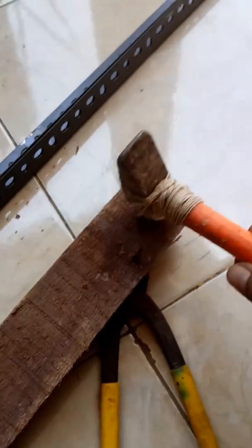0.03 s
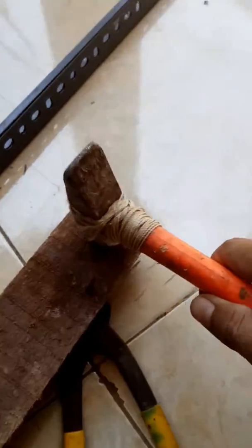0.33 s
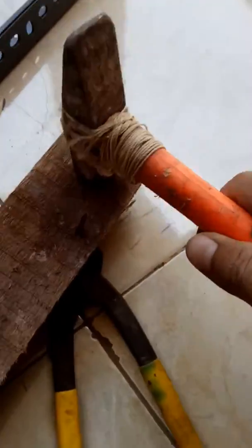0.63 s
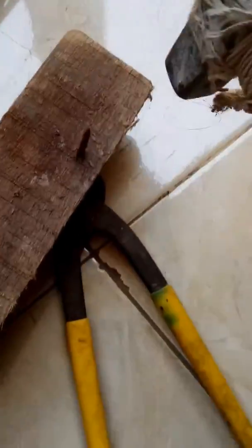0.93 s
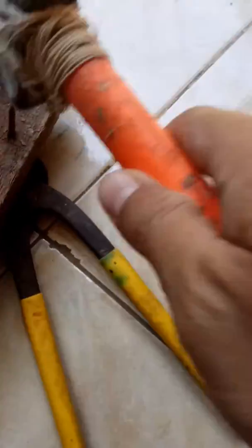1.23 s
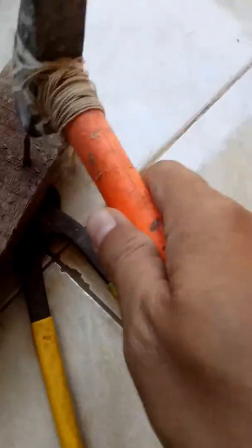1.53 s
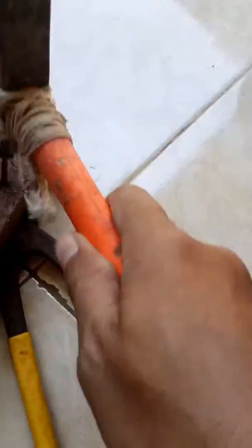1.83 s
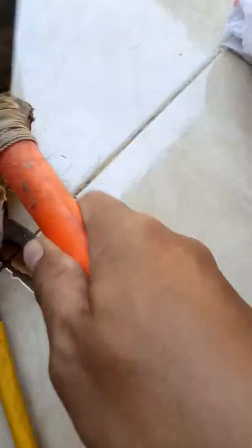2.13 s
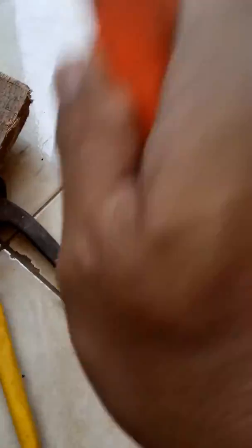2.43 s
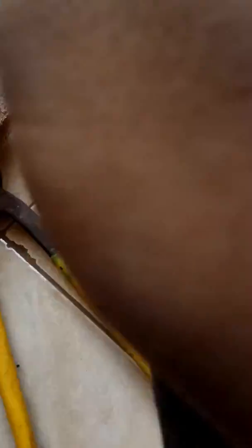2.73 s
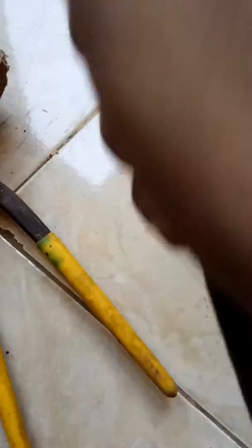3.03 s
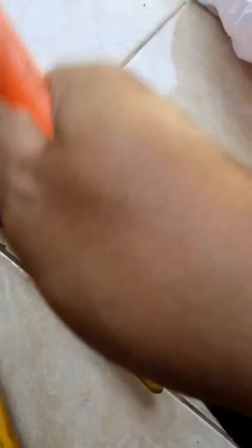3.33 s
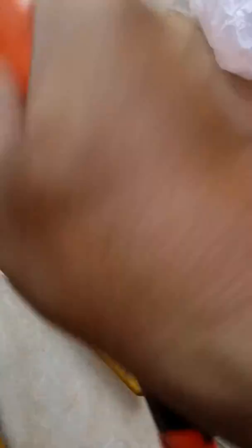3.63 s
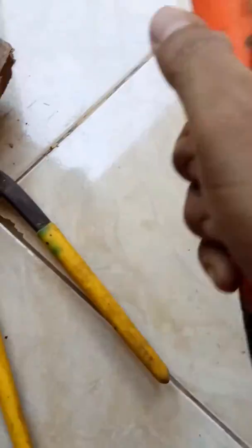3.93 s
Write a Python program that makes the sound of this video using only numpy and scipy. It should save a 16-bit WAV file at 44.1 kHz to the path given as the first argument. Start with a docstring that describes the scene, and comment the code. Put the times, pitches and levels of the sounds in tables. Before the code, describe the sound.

A hammer drives a nail into a plank on a tiled floor. Faint rustling and light taps come first, over a low room rumble. From about 1.5 seconds, seven loud, close blows land roughly a third of a second apart, the last at 3.7. The first clanks metallically; from 2.5 seconds the plank slaps back on the tile. Each slightly distorted hit reverberates briefly in the small room.

```python
"""A hammer drives a nail into a plank lying on the tiled floor of a small, hard room.
Each of seven impacts excites the modes of plank, hammer head and nail: the wood knocks, the steel
cracks, the floor thumps and the room reverberates. On the later blows the plank jumps and slaps back.
Faint handling comes first, over a low room rumble. The close blows overload the recorder, whose
gain control ducks them and holds the reverberation on a short plateau."""
import sys
import numpy as np
from scipy import signal
from scipy.fft import rfft, irfft
from scipy.io import wavfile
from scipy.ndimage import minimum_filter1d

SR = 44100
rng = np.random.default_rng(int(sys.argv[2]) if len(sys.argv) > 2 else 0)


def transcribe(u):
    """Save the signal u as a 16-bit wav file named by the first command-line argument.

    u: samples, shape (n,) or (channels, n), limited to [-1, 1]; the rate is SR.
    q: integer samples, one column per channel.
    """
    v = np.clip(np.atleast_2d(u).T, -1, 1)
    q = np.round(v * 32767).astype(np.int16)
    wavfile.write(sys.argv[1], SR, q)


N = 176400

# Hammer blows. Each row: start in seconds, strength in dB, then the relative knock, plank ring, steel
# crack and sizzle in dB, rattle length in seconds, nail clank in dB, thump in dB, thump lead in seconds.
BLOWS = [(1.5484, -2.5, -1, -7.5, -11, 1, 0.0016, -2, -62, 0.00035),
         (1.8607, 1, 2, 4, -3, 9.5, 0.00067, -42, -23.5, 0.0025),
         (2.1901, 0, 4, -1, 2, 2.5, .01, -24, -61, .016),
         (2.542, -2, 0.5, 2.5, -1, -2.5, 0.022, -22, -23.5, 0.0078),
         (2.9128, -1.5, -4, 1, 6.5, 3, 0.026, -23.5, -31, .017),
         (3.305, 1, -5.5, 0, 1, 7, 0.01, -26, -33, 0.0097),
         (3.7392, -2, -4, 3.5, 2.5, 9, 0.016, -14, -23, 0.0025)]
# The plank slaps back on the tile. Each row: start in seconds, level in dB relative to the blow before.
REBOUNDS = [(2.563, 2), (2.579, 0), (2.939, 0.5), (3.327, -1.5), (3.772, -5)]
# Modes of plank and hammer head. Each row: frequency in Hz, relative level in dB, time to decay by
# 60 dB (T60) in seconds, phase lag of the right channel in radians.
PLANK_HAMMER_MODES = [(521, -18, 0.023, .2), (683.6, -18.5, 0.14, 1.4), (847.4, -6.5, 0.063, 0.94),
                      (886.4, -13.5, 0.28, 3.3), (973, -15, 0.23, 4.1), (1227, -11, 0.041, 2.1),
                      (1342.5, -8, 0.023, 1.7), (1482, -14.5, .08, 1.16), (1742, -7, 0.039, 1.67),
                      (1802, -9.5, 0.19, 1.77), (1830, -12, 0.071, 3.8), (2138, -8, 0.03, 1.97),
                      (2250, -19.5, 0.072, 5.4), (6020, -41.5, 0.05, 4.5), (6285, -28.5, 0.34, 2.8)]
# Modes of the nail. Each row: frequency in Hz, relative level in dB.
NAIL_MODES = [(2200, -2.5), (2690, -11.5), (2850, -29), (2960, -8), (3050, -7.5)]
# Clatter of wood on tile and steel on steel. Each row: frequency in Hz, relative spectral level in dB.
CLATTER_SPECTRUM = [(50, -56.5), (110, 3.5), (260, 2), (400, -4.5), (600, 1), (900, 4), (1800, 5),
                    (2600, 2), (3600, -3.5), (5000, -3), (6500, -2.5), (7800, -13.5), (9800, -13),
                    (13000, -23.5), (15000, -19.5)]
# Sound field near the plank. Each row: frequency in Hz, left-right correlation from -1 to 1.
NEAR_CORRELATION = [(150, 0.84), (450, 0.51), (750, 1), (1200, -0.41), (1900, -0.74), (3500, 0.17),
                    (12000, -0.38)]
# Reverberation time of the room. Each row: frequency in Hz, T60 in seconds.
ROOM_T60 = [(100, 0.65), (260, 0.52), (700, 0.37), (1800, 0.4), (5500, 0.38), (9000, 0.34), (14000, 0.26)]
# Sound field of the room. Each row: frequency in Hz, left-right correlation.
ROOM_CORRELATION = [(60, 1), (140, 1), (250, 1), (450, 0.37), (800, 0), (2000, 0.27), (12000, 0)]
# Light touches as the hammer is picked up. Each row: start in seconds, level in dB, centre frequency
# in Hz, half-width in octaves, T60 in seconds.
TOUCHES = [(0.0588, -23.5, 13900, .3, 0.018), (.074, -40, 13000, .4, 0.08), (0.059, -47.5, 2920, 2, 0.28),
           (0.2, -47.5, 985, 0.063, 0.53), (0.215, -48.5, 4800, 4.6, 0.21), (0.332, -47, 644, 0.45, 0.23),
           (.334, -54, 9000, 1.2, 0.016), (1.242, -53, 1070, 0.4, 0.06)]
# Envelope of the rustle of hand and arm. Each row: time in seconds, level in dB.
RUSTLE_ENVELOPE = [(0, -56.5), (.15, -55), (.28, -56.5), (.42, -66.5), (.55, -55.5), (.8, -54),
                   (1.0, -59.5), (1.25, -66), (1.5, -66.5)]
# Spectrum of that rustle. Each row: frequency in Hz, relative spectral level in dB.
RUSTLE_SPECTRUM = [(350, -17), (650, -6), (800, -19), (1000, -3.5), (1680, -2), (2720, -6.5), (5790, -6.5),
                   (8200, -14), (11000, -8), (13400, -20.5), (15100, -4), (16000, -15.5)]
# Spectrum of the room rumble. Each row: frequency in Hz, relative spectral level in dB.
RUMBLE_SPECTRUM = [(25, -20), (45, -40), (62, -11), (100, -2.5), (140, -3), (200, -7), (260, -11),
                   (400, -22.5), (700, -21), (1000, -24)]
# Sound field of the rumble. Each row: frequency in Hz, left-right correlation.
RUMBLE_CORRELATION = [(50, 0.9), (150, 1), (600, 0.38), (2000, 0)]

RING_N = 2 * SR // 3  # samples allowed for a blow or an echo to die away
LEFT_BIAS = np.array([[1], [-1]])  # adds on the left, subtracts on the right
IMPACT_ATTACK_S, TOUCH_ATTACK_S = 0.00033, 0.00061


def hammering():
    """Impact and rebound: the hammer strikes, and after later blows the plank falls back on the tile."""
    hits = np.zeros((2, N))
    for start_s, db, *tone_db, rattle_s, nail_db, _, _ in BLOWS:
        add(hits, from_db(db) * impact(*tone_db, rattle_s, nail_db), start_s)
    for start_s, rebound_db in REBOUNDS:
        _, db, *tone_db, _, nail_db, _, _ = max(row for row in BLOWS if row[0] < start_s)
        add(hits, from_db(db + rebound_db) * impact(*tone_db, rattle_s=0.0027, nail_db=nail_db), start_s)
    return hits


def impact(knock_db, ring_db, crack_db, sizzle_db, rattle_s, nail_db):
    """Forced, then free vibration: the plank rattles on the tile, feeding its modes, then rings out."""
    t, hz = axes(RING_N)
    colour_db = knock_db * bell(hz, 754, octaves=0.37) + ring_db * bell(hz, 1900, octaves=0.54)
    colour_db += crack_db * above(hz, 3300)
    free_t = np.maximum(t - rattle_s, 0)  # time since the rattle ended
    sound = clatter(colour_db, sizzle_db, free_t) + steel_snap() + nail_clank(nail_db)
    sound += plank_and_hammer_ring(colour_db, free_t)
    return sound * rise(t, IMPACT_ATTACK_S)


def clatter(colour_db, sizzle_db, free_t, t60=0.072):
    """Modal overlap: the dense resonances of wood on tile and steel on steel merge into noise."""
    hz = axes(RING_N)[1]
    treble_db = (sizzle_db + 3 * LEFT_BIAS) * above(hz, 6800)
    spectrum = rfft(noise(at_hz(CLATTER_SPECTRUM, hz), NEAR_CORRELATION, RING_N))
    return irfft(spectrum * from_db(colour_db + treble_db)) * fade(free_t, t60)


def plank_and_hammer_ring(colour_db, free_t, scatter_db=1.5, detune_spread=0.002):
    """Modal superposition: damped sinusoids add, with level, tuning and phase varying at each impact."""
    t, hz = axes(RING_N)
    draws = rng.standard_normal((len(PLANK_HAMMER_MODES), 3))
    ring = np.zeros((2, RING_N))
    for (mode_hz, db, t60, lag), (scatter, detune, phase) in zip(PLANK_HAMMER_MODES, draws):
        gain = from_db(db + scatter_db * scatter + np.interp(mode_hz, hz, colour_db))
        angle = 2 * np.pi * (mode_hz * (1 + detune_spread * detune) * t + phase)
        ring += gain * fade(free_t, t60) * np.sin(angle - np.array([[0], [lag]]))
    return ring


def steel_snap(level_db=-11, edge_hz=5900, t60=0.017):
    """A brief contact has a wide spectrum: the steel faces meet in a short, bright burst."""
    t, hz = axes(RING_N)
    return from_db(level_db) * noise(20 * above(hz, edge_hz), NEAR_CORRELATION, RING_N) * fade(t, t60)


def nail_clank(level_db, t60=0.041):
    """Damped free vibration of the nail, strongest on the first blow, while it stands free."""
    t = axes(RING_N)[0]
    phases = rng.random((len(NAIL_MODES), 2, 1))
    return sum(from_db(level_db + db) * fade(t, t60) * np.sin(2 * np.pi * (mode_hz * t + phase))
               for (mode_hz, db), phase in zip(NAIL_MODES, phases))


def floor_thumps(resonance_hz=87):
    """Transient response: the plank pressed on the floor gives a one-sided pulse and a low ring."""
    t = axes(RING_N)[0]
    push = fade(t, t60=0.13)
    ring = np.sin(2 * np.pi * resonance_hz * t) * fade(t, t60=0.16)
    thump = (push + ring) * rise(t, IMPACT_ATTACK_S)
    thumps = np.zeros((2, N))
    for start_s, *_, thump_db, lead_s in BLOWS:
        add(thumps, from_db(thump_db - 5 * LEFT_BIAS) * thump, start_s - lead_s)
    return thumps


def reverberation(direct, level_db=-4.5, delay_s=0.0032):
    """Diffuse field: reflections from tile and plaster decay exponentially, faster in the treble."""
    t, hz = axes(RING_N)
    white = rfft(noise(np.zeros_like(hz), ROOM_CORRELATION, RING_N))
    edges_hz = np.geomspace(40, 20000, 14)
    tail = np.zeros((2, RING_N))
    for low, high in zip(edges_hz, edges_hz[1:]):
        band = irfft(white * (hz >= low) * (hz < high))
        tail += band * fade(t, at_hz(ROOM_T60, np.sqrt(low * high)))
    tail *= t > delay_s
    tail /= np.sqrt(np.sum(tail ** 2) / 2)  # unit energy per channel, on average
    return from_db(level_db) * signal.fftconvolve(direct, tail, axes=1)[:, :N]


def touches():
    """Weak impacts: light taps of the hammer on the plank each excite a decaying band of noise."""
    t, hz = axes(RING_N // 2)
    taps = np.zeros((2, N))
    for start_s, db, centre_hz, octaves, t60 in TOUCHES:
        band = noise(20 * np.log10(bell(hz, centre_hz, octaves)), ROOM_CORRELATION, len(t))
        add(taps, from_db(db) * band * fade(t, t60) * rise(t, TOUCH_ATTACK_S), start_s)
    return taps


def rustle(grains_per_s=820, grain_db=1.5):
    """Friction noise of the moving hand and arm, made grainy by fast random amplitude modulation."""
    t, hz = axes(N)
    flicker = np.interp(t * grains_per_s, np.arange(RING_N), rng.standard_normal(RING_N))
    level_db = np.interp(t, *np.transpose(RUSTLE_ENVELOPE)) + grain_db * flicker
    return from_db(level_db) * noise(at_hz(RUSTLE_SPECTRUM, hz), ROOM_CORRELATION, N)


def room_rumble(level_db=-50, waver_db=2):
    """Ambient noise: a low rumble whose level wavers under slow random modulation."""
    t, hz = axes(N)
    waver = np.interp(t, np.linspace(0, t[-1], 60), rng.standard_normal(60))
    spectrum_db = at_hz(RUMBLE_SPECTRUM, hz) - 40 * above(hz, 1420)
    return from_db(level_db - waver_db * waver) * noise(spectrum_db, RUMBLE_CORRELATION, N)


def noise(spectrum_db, correlation_table, n):
    """Mid and side noise mix to set the left-right correlation; the result has an rms of 1."""
    correlation = at_hz(correlation_table, axes(n)[1])
    mid, side = rfft(rng.standard_normal((2, n)))
    stereo = np.sqrt(1 + correlation) * mid + np.sqrt(1 - correlation) * side * LEFT_BIAS
    x = irfft(from_db(spectrum_db) * stereo, n)
    return x / x.std()


def from_db(db):
    """Amplitude ratio of a level in decibels."""
    return 10 ** (np.asarray(db) / 20)


def axes(n):
    """Times in seconds and frequencies in Hz of n samples."""
    return np.arange(n) / SR, np.arange(n // 2 + 1) * SR / n


def at_hz(table, hz):
    """Interpolation of a table on a log-frequency axis."""
    table_hz, values = np.transpose(table)
    return np.interp(np.log(hz + 1e-3), np.log(table_hz), values)


def rise(t, attack_s):
    """Exponential approach from 0 to 1."""
    return 1 - np.exp(-t / attack_s)


def fade(t, t60):
    """Exponential decay by 60 dB in t60 seconds."""
    return from_db(-60 * t / t60)


def above(hz, edge_hz):
    """Smooth step from 0 to 1 around an edge frequency."""
    return 1 - 1 / (1 + (hz / edge_hz) ** 8)


def bell(hz, centre_hz, octaves):
    """Resonance-shaped curve of height 1, with its half-width in octaves."""
    return 1 / (1 + (np.log2((hz + 1) / centre_hz) / octaves) ** 2)


def add(out, x, start_s):
    """Superposition of a sound from its start time onward."""
    i = int(start_s * SR)
    out[:, i:i + x.shape[-1]] += x[..., :N - i]


def duck(x, limit_db, attack_s, hold_s, release_db_per_s):
    """Automatic gain control: the gain falls as peaks pass the limit, holds, then recovers steadily."""
    excess_db = np.maximum(20 * np.log10(np.abs(x).max(axis=0) + 1e-9) - limit_db, 0)
    hold_n = 2 * int(hold_s * SR / 2) + 1
    held_db = -minimum_filter1d(-excess_db, hold_n, origin=hold_n // 2)
    ramp_db = release_db_per_s * axes(N)[0]
    reduction_db = np.maximum.accumulate(held_db + ramp_db) - ramp_db
    pole = np.exp(-1 / (attack_s * SR))
    return x * from_db(-signal.lfilter([1 - pole], [1, -pole], reduction_db))


def scene():
    """Sound pressures add: blows, their reverberation, floor thumps, handling and rumble."""
    hits = hammering()
    blows = hits + reverberation(hits) + floor_thumps()
    handling = (rustle() + touches()) * from_db(2 * LEFT_BIAS)
    return blows + handling + room_rumble()


def record(dry, ceiling=0.88, cutoff_hz=15700):
    """Dynamic compression: a slow leveller and a fast limiter, then soft clipping and a low-pass."""
    levelled = duck(dry, limit_db=-2, attack_s=0.032, hold_s=0.0017, release_db_per_s=160)
    limited = duck(levelled, limit_db=4.5, attack_s=0.0024, hold_s=0.0013, release_db_per_s=390)
    clipped = ceiling * np.tanh(limited / ceiling)
    return signal.sosfilt(signal.ellip(10, 0.3, 70, cutoff_hz, fs=SR, output="sos"), clipped)


dry = scene()
out = record(dry)
transcribe(out)
```